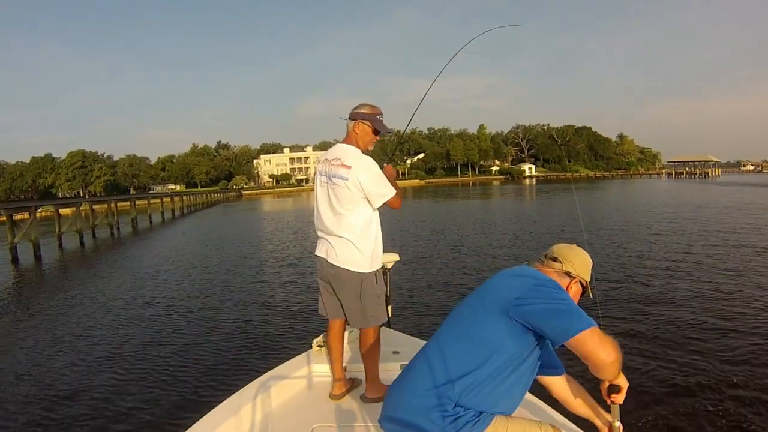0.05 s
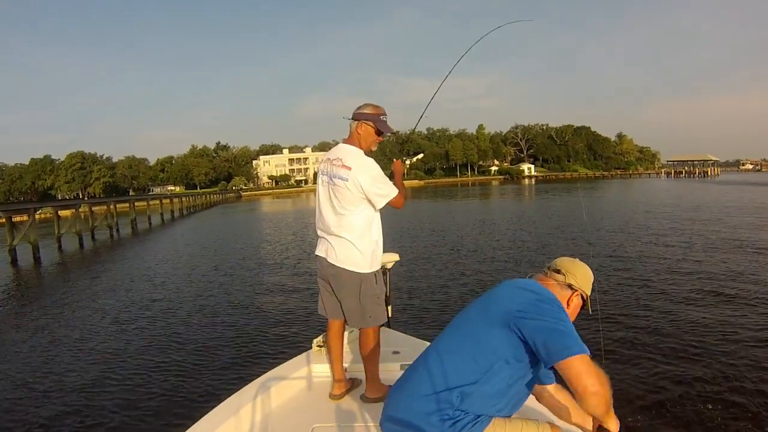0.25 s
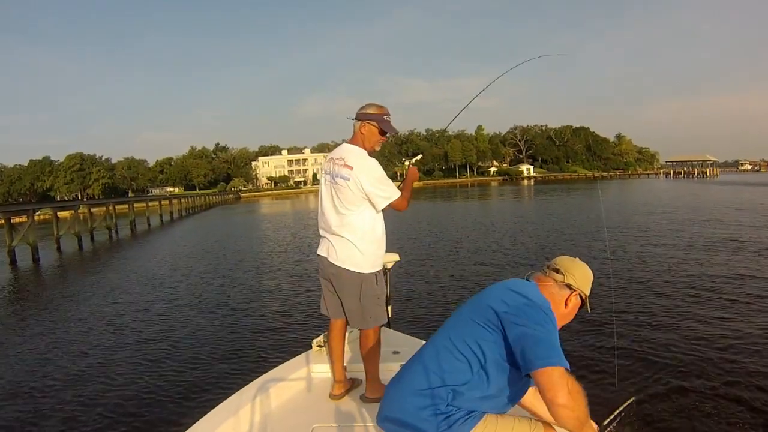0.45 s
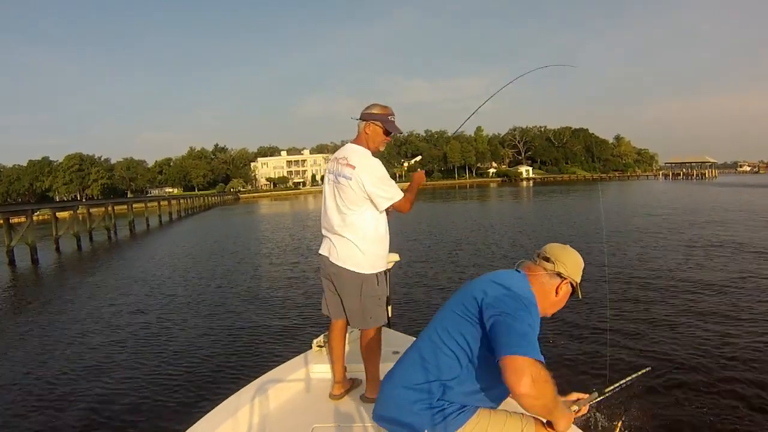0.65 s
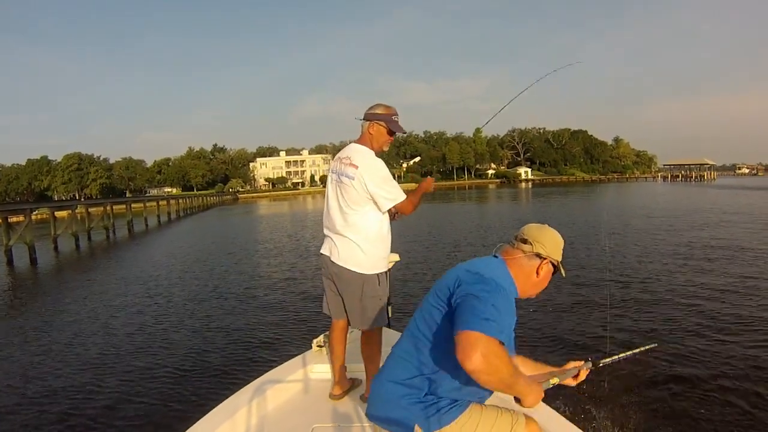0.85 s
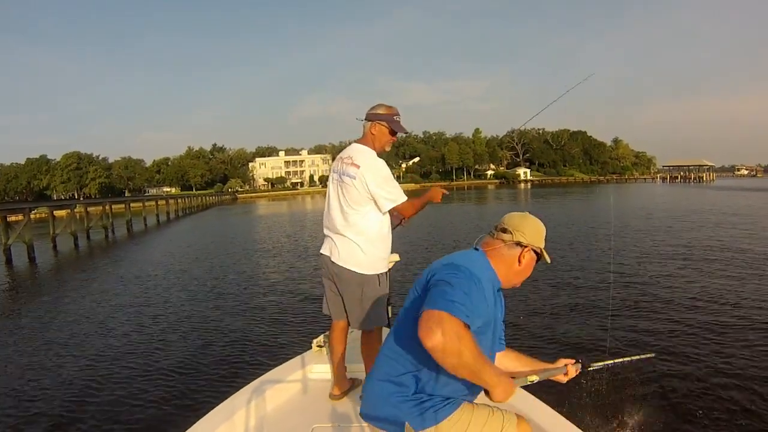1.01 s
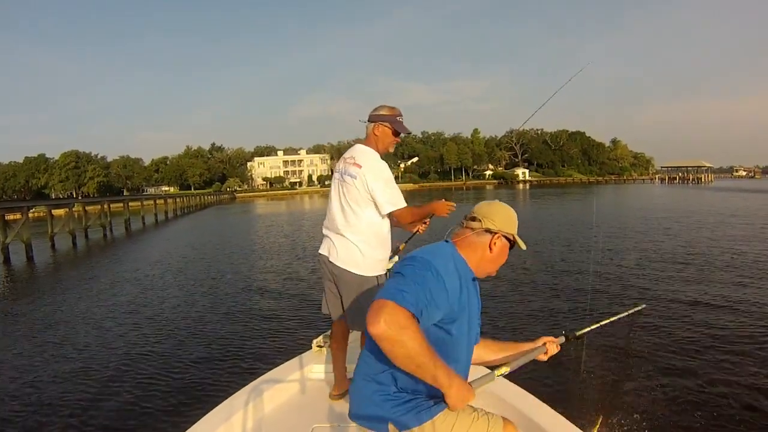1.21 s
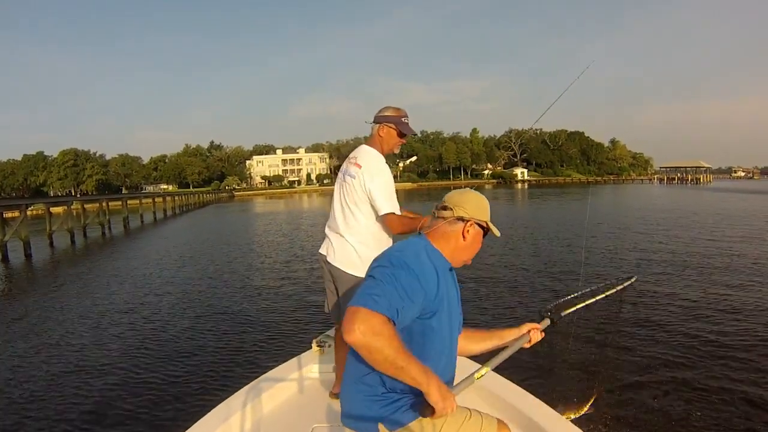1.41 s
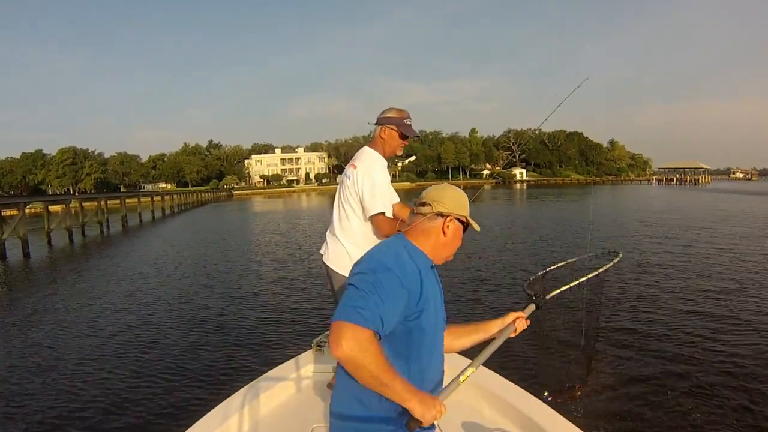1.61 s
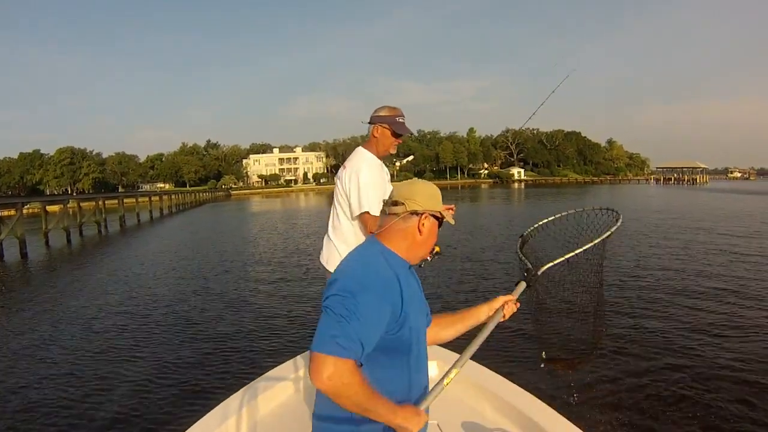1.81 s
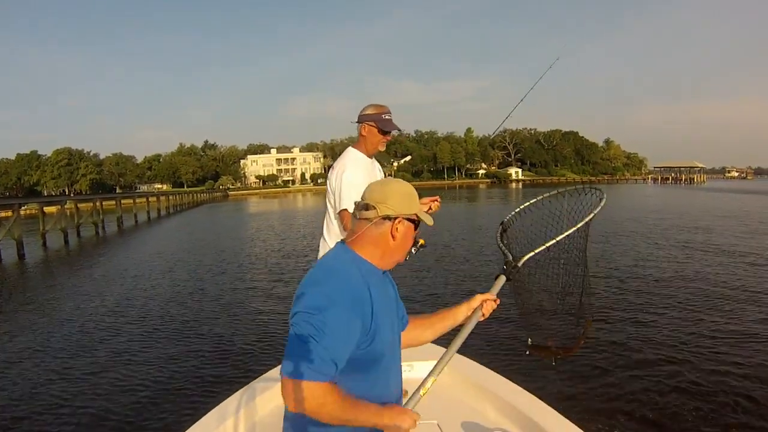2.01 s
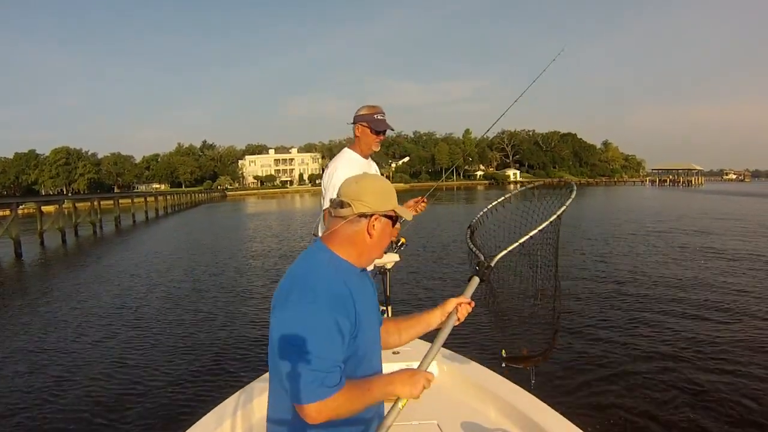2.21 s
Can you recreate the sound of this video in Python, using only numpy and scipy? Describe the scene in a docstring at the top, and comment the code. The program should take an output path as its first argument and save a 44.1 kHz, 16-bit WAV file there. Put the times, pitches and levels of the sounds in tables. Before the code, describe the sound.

Feet and knees thump dully on a small boat's hollow deck, with faint tackle ticks and shuffling soles. A landing net's handle knocks lightly twice near the end. Heard from on board, over a low rumble and faint hiss.

```python
"""Feet and knees thump the deck of a small fibreglass boat while a landing net is lifted.
The thumps swell in the hollow hull's low modes and rattle its panels; hard landings add a dry slap.
Tackle ticks faintly, soles scuff, and the net's handle knocks twice near the end.
Underneath lie the low stir of the hull on calm water, a steady hiss and a faint electronic whine."""
import sys
import numpy as np
from scipy import signal
from scipy.fft import rfft, irfft
from scipy.io import wavfile

SR = 44100
rng = np.random.default_rng(int(sys.argv[2]) if len(sys.argv) > 2 else 0)


def master_out(mix):
    """Clip the mix to full scale and print it as 16-bit PCM to the path in sys.argv[1]."""
    frames = np.transpose(np.atleast_2d(mix))
    ceiling = np.clip(frames, -1, 1)
    pcm = np.round(ceiling * 32767).astype(np.int16)
    wavfile.write(sys.argv[1], SR, pcm)


N = 103635

# The hollow hull's voice. Each row: pitch in Hz, level in dB, t60 in seconds.
HULL_MODES = [(36.1, 0.4, 2.03), (67.1, -12.5, 1.73), (92.63, 3, 1.123), (95.68, -2, 0.57),
              (116, -10, 0.48), (130, -8, 0.58), (169.5, -4.5, .67), (175.16, 8.5, .17), (187.1, -10, 0.69),
              (210.1, -13.5, 0.47), (321.6, -4, 0.17), (330, -7, 0.3), (371.8, -8.5, .26), (399.2, 4, 0.14),
              (430.3, -7, 0.16)]
# Thumps on the deck, with faint pushes that damp the hull's boom. Each row: start in seconds,
# gains in dB for sway, boom, body and knock, then softness as cycles of build-up.
DECK_IMPULSES = [(-0.0025, -37.5, -46, -41, -58, 0.24), (0.0899, -37, -38, -66.5, -66, 2.8),
                 (0.1739, -50.5, -35.5, -38.5, -50, 2.1), (0.197, -58.5, -31.5, -35, -70, 3.2),
                 (0.2777, -68, -35.5, -47.5, -65, 4.6), (0.429, -41.5, -34.5, -36, -69, 2.7),
                 (0.4539, -56, -19.5, -25.5, -31, 3.5), (0.4697, -28.5, -38.5, -19.5, -30.5, 1.75),
                 (0.5129, -22.5, -55, -22, -86, 2.6), (0.848, -48.5, -45, -66.0, -65, 0.6),
                 (0.9457, -41, -36, -55, -68, 8.1), (1.0575, -41, -46, -48.5, -73, 5.6),
                 (1.2108, -37.5, -39.5, -48.7, -68, 3.1), (1.3197, -67, -34.5, -29.5, -49.5, 4.7),
                 (1.4249, -69, -38, -31.5, -44, 1.25), (1.447, -24.5, -30.5, -29, -48, 1.7),
                 (1.7635, -69, -25.5, -26.5, -36.5, 1.8), (1.7818, -68, -25.5, -50, -68, 0.6),
                 (2.0792, -42.5, -36, -62, -59, 1.8), (2.1804, -59, -47, -68, -67, 3.6)]
# Where sway, boom, body and knock sit, in Hz.
REGISTER_CENTRES_HZ = (36, 92, 175, 380)
# Colour of the panel rattle. Each row: frequency in Hz, relative level in dB.
PANEL_SPECTRUM = [(120, -3), (250, -65.5), (330, 11), (450, 3), (540, -17), (700, -16.5), (950, -20.5),
                  (1300, -39), (2400, -30.5), (5000, -53.5)]
# Colour of the hull stirring on the water. Each row: frequency in Hz, relative level in dB.
STIR_SPECTRUM = [(10, -1.5), (16, 15.5), (25, -7.5), (36, -8.5), (52, -6), (68, -7), (92, -13.5),
                 (125, -15), (180, 0), (230, -14), (275, -14.5), (305, -6), (345, -19), (600, -26)]
# Colour of the hiss. Each row: frequency in Hz, relative level in dB.
HISS_SPECTRUM = [(350, -3), (600, -2), (715, -3.5), (775, -4.5), (1330, -7.5), (1890, -6.5), (2980, -10.5),
                 (3460, -10.5), (8990, -17), (12800, -21.5), (15000, -25.5)]
# Whine of the electronics. Each row: pitch in Hz, rms level in dB.
WHINE_TONES = [(4376, -94), (8751, -92), (13067, -97)]
# Hard landings. Each row: start in seconds, level in dB, t60 in seconds.
DECK_SLAPS = [(0.452, -52.5, 0.13), (1.419, -67, 0.088), (1.761, -51, 0.16)]
# Colour of a slap. Each row: frequency in Hz, relative level in dB.
SLAP_SPECTRUM = [(300, -1.5), (520, 2.5), (700, -3.5), (920, 11.5), (1150, -4), (1500, -23.5), (2300, -17),
                 (4000, -33)]
# Net and tackle. Each row: start in seconds, level in dB, centre and width in Hz, t60 in seconds.
TACKLE_TAPS = [(.479, -62, 2210, 504, .06), (0.562, -56, 1050, 302, 0.051), (0.956, -58, 6130, 2790, .04),
               (1.05, -60.5, 3570, 3966, 0.047), (1.271, -61.5, 2500, 1000, 0.13),
               (1.474, -57.5, 1990, 900, 0.032)]
# Soles shifting. Each row: peak time and half length in seconds, level in dB.
SOLE_SCUFFS = [(1.207, 0.14, -64.5), (1.342, .035, -48), (1.906, .04, -61.5)]
# Colour of their rub. Each row: frequency in Hz, relative level in dB.
SCUFF_SPECTRUM = [(100, -12), (190, 0.5), (260, 1.5), (330, 1), (390, -7), (480, -26), (900, -41.5)]
# The net's handle knocking. Each row: start in seconds, level in dB, trim on the upper modes in dB.
HANDLE_HITS = [(2.067, -47, -2.5), (2.324, -50, -18)]
# The handle's voice. Each row: pitch in Hz, relative level in dB, t60 in seconds.
HANDLE_MODES = [(884, 1, 0.075), (2010, -1, 0.093), (2740, -6, .08), (3730, -11, 0.13)]


def undb(db):
    """Decibels to gain."""
    return 10 ** (np.asarray(db) / 20)


def noise(points):
    """Noise of rms 1, coloured by (Hz, dB) points and rolled off an octave above the last."""
    hz, db = np.array(points, float).T
    f = np.maximum(np.arange(N // 2 + 1) * SR / N, 1)
    gain = undb(np.interp(np.log(f), np.log(hz), db)) / (1 + (f / (2 * hz[-1])) ** 4)
    x = irfft(rfft(rng.standard_normal(N)) * gain, N)
    return x / x.std()


def band(hz, width):
    """Noise of rms 1 in one resonance."""
    f = np.arange(N // 2 + 1) * SR / N
    x = irfft(rfft(rng.standard_normal(N)) / (1 + (2 * (f - hz) / width) ** 2), N)
    return x / x.std()


def since(start):
    """Seconds since a moment, zero before it."""
    return np.maximum(np.arange(N) / SR - start, 0)


def ring(age, rise_s, t60):
    """Envelope that builds up and dies away."""
    return (1 - np.exp(-age / rise_s)) * np.exp(-np.log(1000) * age / t60)


def hull_thumps():
    """Each thump rings the same modes with its own balance and attack; out-of-phase pushes damp them."""
    out = np.zeros(N)
    for start, *register_db, cycles in DECK_IMPULSES:
        age = since(start)
        for hz, db, t60 in HULL_MODES:
            live = slice(max(int(start * SR), 0), int((start + t60) * SR))
            drive_db = np.interp(np.log(hz), np.log(REGISTER_CENTRES_HZ), register_db)
            envelope = ring(age[live], max(cycles, 0.5) / hz, t60)
            out[live] += undb(db + drive_db) * envelope * np.sin(2 * np.pi * hz * age[live])
    return out


def panel_rattle(trim_db=-9):
    """The knock of each impulse shakes the deck panels, whose many short modes blur into noise."""
    power = np.zeros(N)
    for start, *_, knock_db, cycles in DECK_IMPULSES:
        envelope = ring(since(start), rise_s=0.00095 * max(cycles, 0.5), t60=0.25)
        power += (undb(trim_db + knock_db) * envelope) ** 2
    return np.sqrt(power) * noise(PANEL_SPECTRUM)


def water_stir(level_db=-50):
    """Calm water nudges the hull into a soft, low rumble."""
    return undb(level_db) * noise(STIR_SPECTRUM)


def hiss_and_whine(hiss_db=-64):
    """An even bed of hiss with the thin, steady tones of the electronics."""
    whine = sum(np.sqrt(2) * undb(db) * np.sin(2 * np.pi * hz * since(0)) for hz, db in WHINE_TONES)
    return undb(hiss_db) * noise(HISS_SPECTRUM) + whine


def deck_slaps():
    """A hard landing smacks a short, dry burst out of the deck."""
    envelope = sum(undb(db) * ring(since(start), 0.00076, t60) for start, db, t60 in DECK_SLAPS)
    return envelope * noise(SLAP_SPECTRUM)


def tackle_ticks():
    """Net and tackle tap lightly, each tick one brief, bright resonance."""
    return sum(undb(db) * ring(since(start), 0.001, t60) * band(hz, width)
               for start, db, hz, width, t60 in TACKLE_TAPS)


def sole_scuffs():
    """Soles rub the deck as the weight shifts: dull noise that swells and fades."""
    power = sum(undb(db) ** 2 * np.exp(-((since(0) - peak) / half) ** 2)
                for peak, half, db in SOLE_SCUFFS)
    return np.sqrt(power) * noise(SCUFF_SPECTRUM)


def handle_knocks(rise_s=0.0061):
    """The net's handle knocks, its damped modes sounding as narrow bands of noise."""
    out = np.zeros(N)
    for start, knock_db, upper_db in HANDLE_HITS:
        for mode, (hz, db, t60) in enumerate(HANDLE_MODES):
            gain = undb(knock_db + db + upper_db * (mode > 0))
            out += gain * ring(since(start), rise_s, t60) * band(hz, width=0.15 * hz)
    return out


def scene():
    """The mono mix, heard from on board."""
    bed = water_stir() + hiss_and_whine()
    deck = hull_thumps() + panel_rattle() + deck_slaps() + sole_scuffs()
    gear = tackle_ticks() + handle_knocks()
    return (bed + deck + gear)[None]


def record(dry):
    """A steep low-pass shaves off the air above 15250 Hz."""
    return signal.sosfilt(signal.ellip(10, 0.2, 80, 15250, fs=SR, output="sos"), dry)


dry = scene()
out = record(dry)
master_out(out)
```